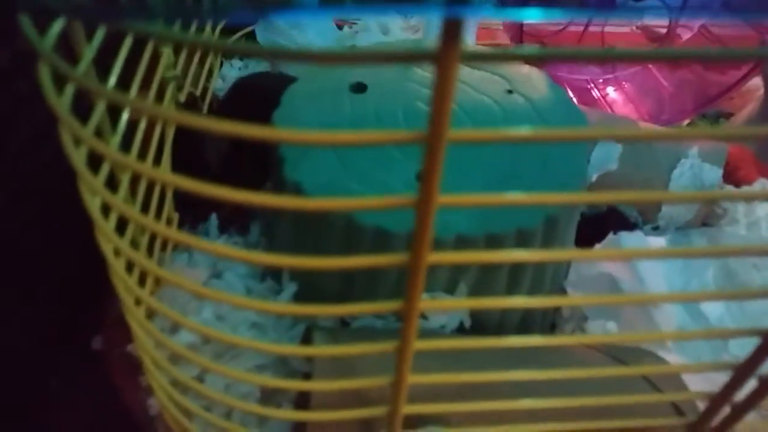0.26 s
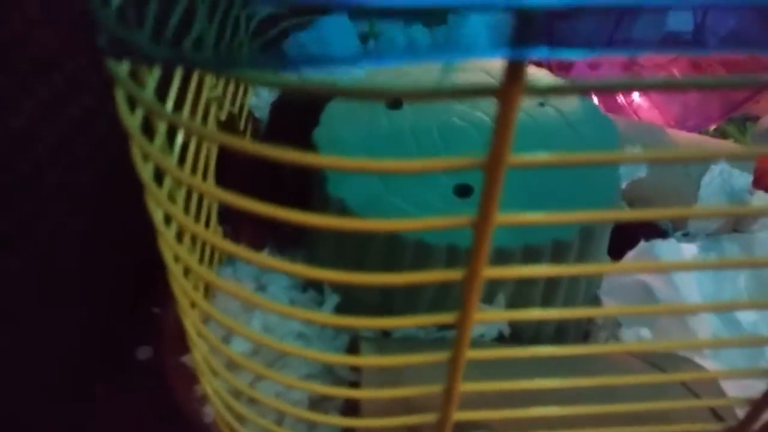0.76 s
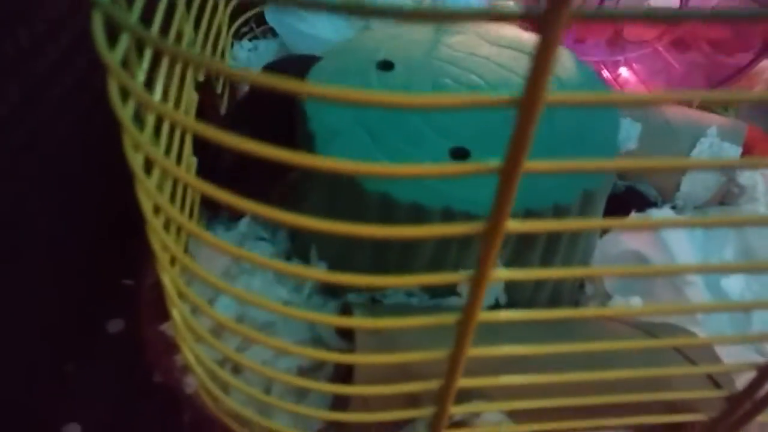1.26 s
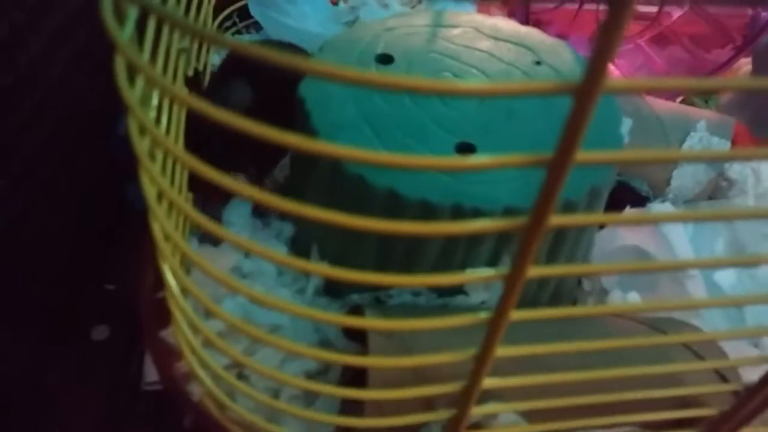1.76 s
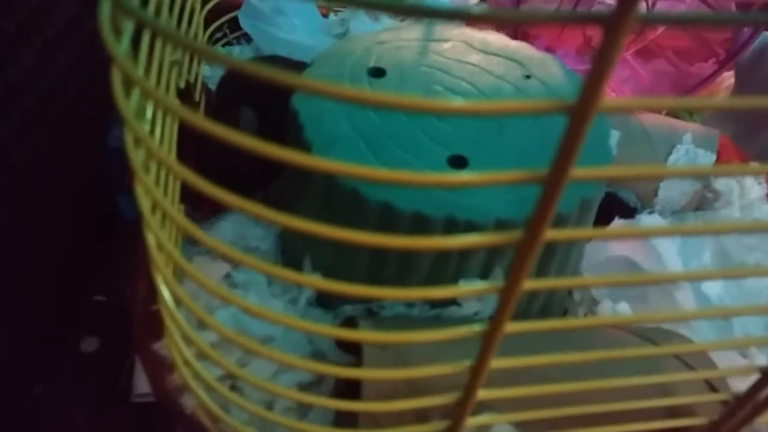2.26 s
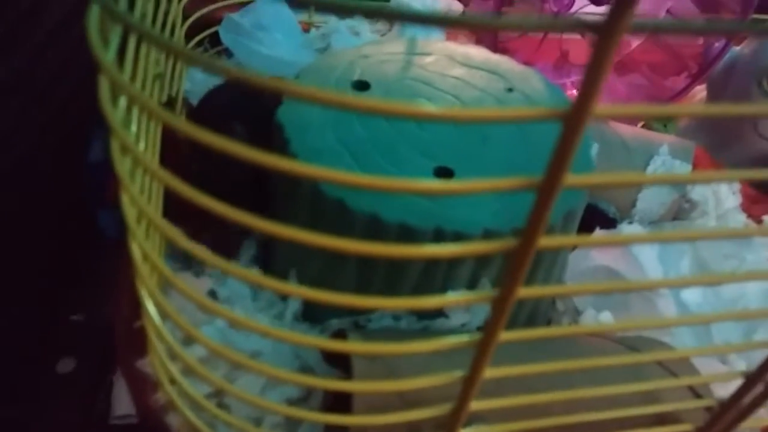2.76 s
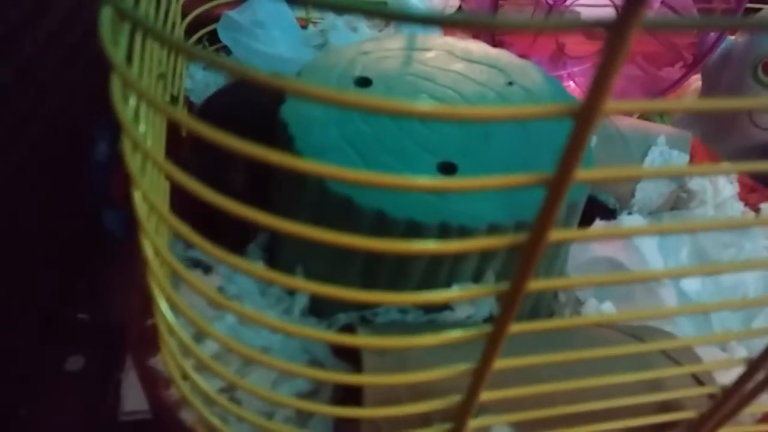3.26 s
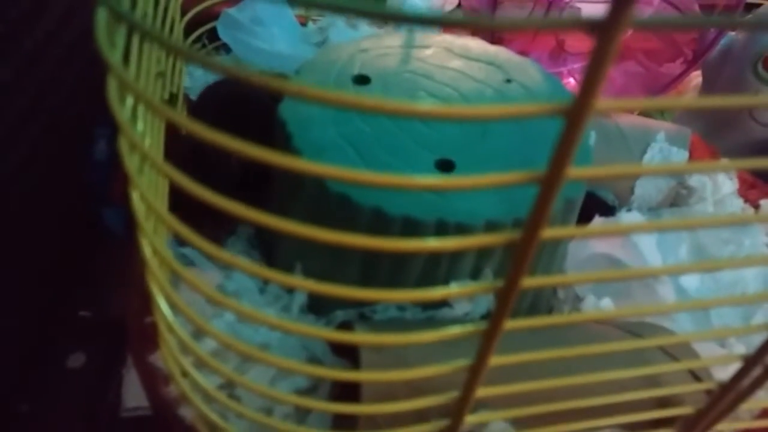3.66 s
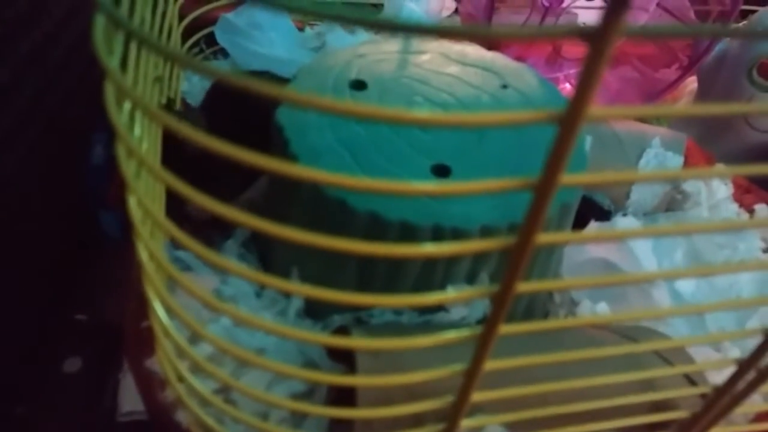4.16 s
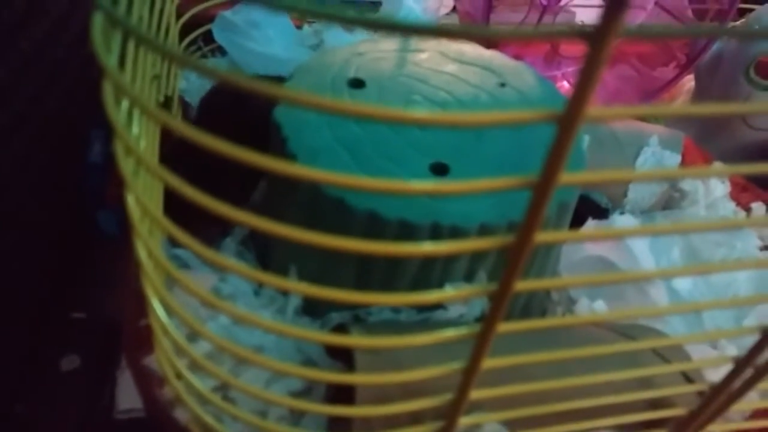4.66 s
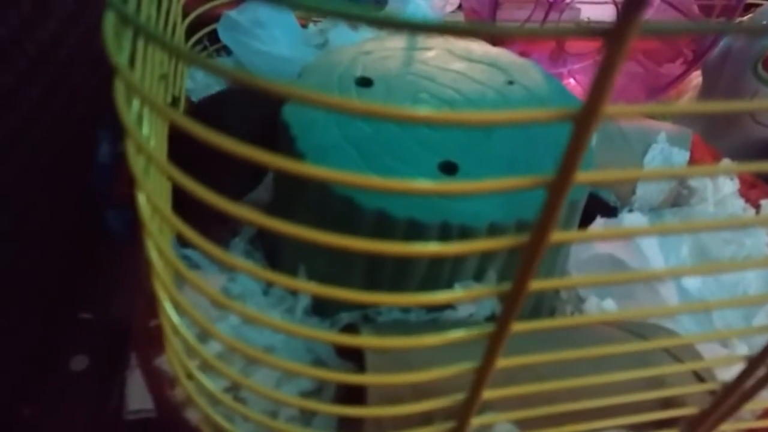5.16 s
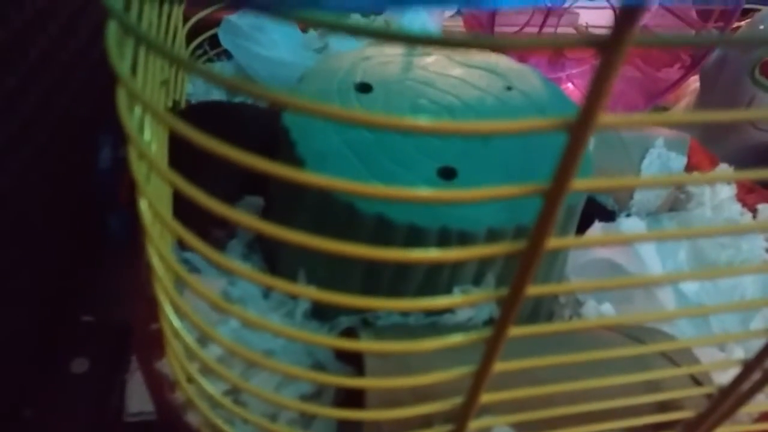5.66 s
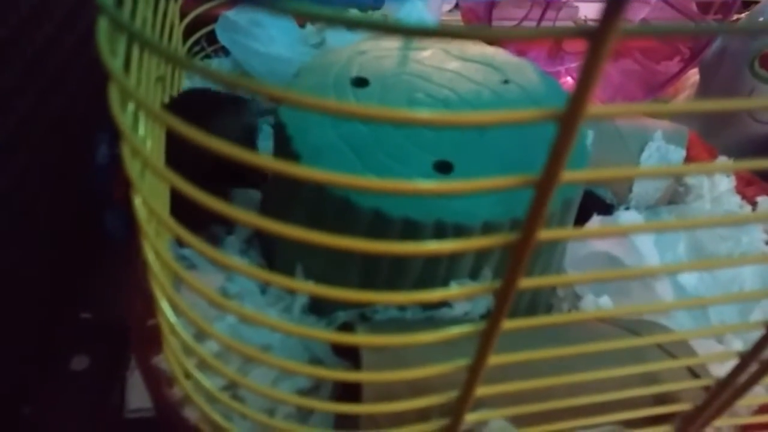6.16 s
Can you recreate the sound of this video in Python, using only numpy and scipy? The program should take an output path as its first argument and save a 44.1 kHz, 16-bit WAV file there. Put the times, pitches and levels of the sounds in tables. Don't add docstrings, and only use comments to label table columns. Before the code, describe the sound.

A small pet rodent digs in paper bedding in its cage, with dry snaps, soft knocks and a few sharp loud plastic pops.

```python
import sys
import numpy as np
from scipy import signal
from scipy.fft import rfft, irfft
from scipy.io import wavfile
from scipy.ndimage import uniform_filter1d

SR = 44100
rng = np.random.default_rng(int(sys.argv[2]) if len(sys.argv) > 2 else 0)


def volts_from_decibels(level):
    exponent = np.asarray(level, float) / 20
    return 10 ** exponent


def transcribe(signal):
    frames = np.atleast_2d(signal).T
    limited = np.clip(frames, -1, 1)
    pcm = np.round(limited * 32767).astype(np.int16)
    wavfile.write(sys.argv[1], SR, pcm)


N = 283104
TIME = np.arange(N) / SR

# start in seconds, peak in dB, crack pitch in Hz,
# sharp edge in dB relative to the peak.
STIFF_FOLDS = [(0.0294, -21.5, 2000, -25), (0.0702, -16.5, 2060, -29), (0.0716, -41, 1910, -14),
               (0.1448, -17.5, 2090, -21.5), (0.148, -30.5, 2190, -11), (0.1723, -19, 1800, -38),
               (0.228, -16.5, 1960, -33), (0.231, -33, 1700, -11), (0.3256, -18, 1970, -28.5),
               (0.3704, -23.5, 1830, -29), (0.602, -20, 1960, -21), (0.733, -27, 1540, -40),
               (1.0988, -23, 2350, -26), (1.1564, -17, 1940, -29), (1.2135, -17.5, 1830, -43),
               (1.5862, -16.5, 1980, -23), (1.589, -24, 1610, -18), (1.63, -16.5, 2100, -20),
               (1.648, -34, 2290, -16), (2.7149, -13, 1630, -30), (2.7161, -21, 2000, -17),
               (2.7174, -18, 1250, -19.5), (4.0582, -25, 1590, -27), (4.3329, -21, 1930, -20),
               (4.3361, -25, 2040, -36), (4.6196, -14.5, 1680, -22), (4.6209, -14.5, 1900, -25),
               (5.4714, -17, 1900, -15.5), (5.4736, -19.5, 1740, -19), (5.4763, -22.5, 1300, -30)]
# start in seconds, peak in dB, crack pitch in Hz.
SOFT_CREASES = [(0.1743, -37, 1680), (5.473, -19, 1800), (0.3276, -27.5, 1530), (0.3724, -30, 1560),
                (0.3753, -28, 1460), (0.826, -36, 1680), (0.969, -38, 1860), (1.0005, -36, 2330),
                (1.0163, -30, 2360), (1.1121, -26, 1850), (1.1874, -24, 1710), (1.3268, -43.5, 2220),
                (1.441, -41.5, 1680), (1.4552, -40, 1720), (1.5795, -29, 1520), (1.5955, -32, 1530),
                (1.6258, -25, 1500), (1.6451, -32, 1930), (1.7116, -29.5, 2380), (1.7262, -36.5, 2450),
                (1.74, -38, 2150), (2.1255, -35, 1980), (4.6217, -33, 2000), (2.7194, -20.5, 1010),
                (2.899, -37, 1520), (3.244, -42.5, 2200), (2.712, -30, 1700), (4.6161, -30, 1500),
                (4.7594, -37, 1640), (5.467, -32, 1410)]
CREASE_EDGE_DB = -40

# start in seconds, peak in dB, fade in ms,
# slowing from 0 to 1 (1 = steady pitch), sharp edge in dB relative to the peak.
WALL_POPS = [
    (1.1623, -13, 0.57, 0.6, -40),
    (2.7224, -9.5, 1.2, 0.59, -32),
    (4.3402, -2.5, 0.82, 0.45, -3.5),
    (4.6224, -1, 1.15, 0.67, -8.5),
    (5.4774, -5, 0.95, 0.5, -8),
]
FIRST_SWING_MS, FIRST_SWING_SHARE = 0.24, 0.27

# top of the swing in seconds, peak in dB, swing pitch in Hz.
KICKS = [(0.0322, -28.5, 343), (0.1004, -37, 432), (0.1761, -21.5, 230), (0.2307, -15.5, 244),
         (0.358, -33, 404), (0.377, -18.5, 230), (0.6024, -25.5, 298), (0.736, -25, 366),
         (0.7744, -31, 268), (0.7807, -27, 334), (0.8941, -31, 330), (1.0159, -22, 388), (1.188, -16, 370),
         (1.2148, -21, 363), (1.4444, -35, 348), (1.537, -36, 328), (1.6313, -7, 308), (1.6456, -14, 386),
         (1.7144, -27.5, 420), (1.7291, -30, 415), (1.743, -31.5, 440), (2.1283, -34, 298),
         (2.6629, -27.5, 383), (2.7155, -25, 478), (2.7628, -33, 320), (3.519, -35, 350),
         (4.4529, -30, 313), (5.3498, -34, 386), (5.3706, -34.5, 367), (5.472, -25, 420)]
# top of the swing in seconds, peak in dB, swing pitch in Hz.
PAW_STEPS = [(0.1458, -33.5, 540), (0.4473, -33, 207), (0.474, -28.5, 420), (0.7, -33, 400),
             (0.972, -28, 373), (1.0372, -28, 370), (1.1005, -26, 328), (1.1159, -17, 376),
             (1.3878, -35, 392), (1.4148, -38, 347), (1.5951, -25, 440), (1.917, -24.5, 482),
             (2.1904, -24, 486), (2.2714, -26, 480), (2.6569, -28.5, 420), (2.713, -28, 500),
             (2.8624, -23.5, 420), (2.916, -25, 487), (3.3388, -33.5, 420), (4.0581, -28, 362),
             (4.0967, -42, 322), (4.208, -44, 120), (4.3335, -25.5, 510), (4.4607, -33, 424),
             (4.4977, -36, 463), (4.7449, -30.5, 404), (4.96, -31, 420), (5.1175, -26.5, 436),
             (5.1392, -42, 353), (5.3868, -28, 500)]
# top of the swing in seconds, peak in dB, swing pitch in Hz.
NUDGES = [(0.0721, -32.5, 437), (0.3263, -25.5, 355), (0.3465, -35.5, 523), (0.6832, -29, 414),
          (0.7273, -31, 310), (0.832, -36.5, 290), (0.645, -38.5, 151), (0.536, -40, 190),
          (1.1756, -25.5, 376), (1.3219, -36, 408), (1.3287, -36, 460), (1.3493, -29.5, 185),
          (1.4771, -36.5, 420), (1.661, -40, 604), (2.5576, -32.5, 434), (2.619, -30, 493),
          (2.163, -43, 420), (2.8994, -29, 443), (3.5063, -39.5, 394), (4.227, -49, 155), (4.337, -26, 475),
          (4.41, -39.5, 473), (4.7755, -37.5, 486), (5.0685, -40, 386), (5.134, -52, 342),
          (5.032, -46.5, 330), (5.2333, -38.5, 420), (6.2406, -51, 260), (6.2525, -48, 217),
          (6.3722, -36, 183)]
# top of the swing in seconds, peak in dB, swing pitch in Hz.
LEANS = [(0.878, -28.5, 460), (1, -32, 420), (1.5879, -33.5, 380), (2.7983, -33.5, 530), (4.59, -32, 470),
         (1.87, -46, 410), (1.606, -40, 430)]
KICK_SWINGS, STEP_SWINGS, NUDGE_SWINGS, LEAN_SWINGS = 0.78, 1.09, 1.815, 3.36
TRAY_HUM_HZ, TRAY_HUM_WIDTH_HZ, TRAY_HUM_DB = 440, 59, -5
TRAY_TICK_HZ, TRAY_TICK_WIDTH_HZ, TRAY_TICK_DB = 1037, 330, -2.5

# start in seconds, hold in seconds, drag in dB,
# dry scratch in dB.
DIG_STROKES = [(0.34, .01, -53, -66), (0.466, 0.049, -53.5, -56.5), (0.599, 0.0046, -49.5, -74),
               (0.723, 0.0092, -35, -55), (0.737, 0.019, -49, -39), (0.798, 0.05, -51.5, -51),
               (0.87, 0.014, -49, -59), (0.985, 0.048, -38.5, -46.5), (1.119, .01, -39, -71),
               (1.171, 0.0055, -33.5, -42), (1.222, 0.038, -47, -41), (1.325, .03, -51, -56),
               (1.631, 0.0044, -35, -70), (1.749, .02, -52, -72), (1.885, 0.035, -54.5, -68),
               (2.214, 0.084, -52, -66), (2.6, 0.039, -49.5, -58), (2.533, 0.03, -48, -64),
               (2.722, 0.074, -39, -45), (2.865, 0.029, -41, -59), (3.027, .07, -57.5, -65),
               (3.511, 0.004, -57.5, -59), (4.226, .01, -53, -73), (4.328, .005, -51, -70),
               (4.436, 0.05, -41.5, -51.5), (4.55, 0.062, -43.5, -60), (4.752, 0.035, -46.5, -56.5),
               (5.341, 0.018, -56.5, -67), (5.463, .005, -56, -75), (6.243, .01, -58, -75)]
STROKE_RISE_DB_S, STROKE_FALL_DB_S = 483, 398
SCRATCH_RISE_DB_S, SCRATCH_FALL_DB_S = 700, 1100
# time in seconds, drag in dB.
FIDGETING = [(0, -63), (.05, -57.5), (.32, -64), (1.3, -57.5), (1.58, -60.5), (1.8, -61), (2.0, -68.5),
             (2.2, -56), (2.36, -73), (2.41, -52), (2.49, -64.5), (2.68, -64), (3.1, -60.5), (3.48, -68.5),
             (4.72, -68), (4.81, -64), (5.2, -68.5), (6.42, -69.5)]
FIDGET_SCRATCH_DB, FIDGET_SCRATCH_SHARE = -71, 0.46
BRIGHT_ABOVE_HZ, BRIGHT_AT_DB, BRIGHT_SHARE = 1400, -43.5, 0.27
# start in seconds, hold in seconds, rumble in dB,
# settling in dB per second.
WEIGHT_SHIFTS = [(0.113, 0.14, -53, 550), (0.336, .37, -53, 50), (0.731, .005, -42, 110),
                 (0.993, 0.21, -48.5, 130), (1.346, 0.0046, -40, 420), (1.398, 0.21, -53, 100),
                 (1.642, 0.026, -41, 108), (2.11, .005, -50, 95), (2.585, 0.11, -49, 100),
                 (2.745, .005, -41.5, 125), (3.01, 0.22, -54, 84), (3.52, .005, -57.5, 109),
                 (4.06, .005, -59.5, 122), (4.217, 0.0046, -54, 337), (4.335, .005, -46, 853),
                 (4.448, .005, -44, 420), (4.55, .07, -75.5, 194), (4.75, .005, -62, 78),
                 (4.978, 0.1, -62, 90), (5.43, 0.062, -55, 432), (6.221, .005, -51, 120)]
SHIFT_RISE_DB_S, STILL_DB = 450, -78
# pitch in Hz, width in Hz, level in dB.
TRAY_MODES = [(230, 150, -5.5), (420, 105, 0.5), (603, 288, -8)]
# pitch in Hz, width in Hz, level in dB.
PAPER_MODES = [(805, 146, 5), (1146, 154, 1.5), (1640, 116, -5), (2080, 255, -6), (2470, 310, -12.5),
               (3500, 640, -18.5), (7300, 2600, -29.5)]

# frequency in Hz, level in dB per Hz.
HISS_COLOUR = [(25, -18), (55, -7.5), (200, 0.5), (600, -17.5), (1500, -11), (5000, -17), (9200, -23.5),
               (15000, -17.5)]
HISS_TOP_HZ = 15750
# pitch in Hz, level in dB rms.
MAINS_HUM = [(60, -81), (120, -80), (240, -79), (360, -76), (480, -104.5), (634, -90)]
WHINE_HZ, WHINE_WIDTH_HZ, WHINE_DB = 8170, 73, -15.5
SWISH_S, SWISH_HOLD_S, SWISH_DB, SWISH_SLOPE_DB_S = 1.24, 0.013, -62.5, 254
GATE_SHUT_DB, GATE_OPEN_DB = -75, -68
GATE_FROM_DB, GATE_FULL_DB = -69.5, -60
GATE_HEARS_S, GATE_LAG_S = 0.01, 0.028
PORT_HZ, PORT_WIDTH_HZ = 13300, 4500
TOP_HZ = 16600


def curve(table):
    s, *columns = np.transpose(table)
    return [np.interp(TIME, s, c) for c in columns]


def unit(x):
    return x / np.sqrt(np.mean(x ** 2))


def ring(x, hz, width_hz):
    return signal.lfilter(*signal.iirpeak(hz, hz / width_hz, fs=SR), x)


def body(x, modes):
    total = 0
    for k, (hz, width, db) in enumerate(modes):
        once = ring(x, hz, 1.64 * width)
        total = total + (-1) ** k * volts_from_decibels(db) * ring(once, hz, 1.64 * width)
    return unit(total)


def grains(rate, spread_db, smooth):
    when, size = rng.random(N), rng.random(N)
    sign, rub = rng.standard_normal(N), rng.standard_normal(N)
    slips = (when < rate / SR) * volts_from_decibels(spread_db * size) * np.sign(sign)
    return unit(slips) + smooth * rub


def walk(rate):
    k = int(SR / rate)
    steps = np.repeat(rng.standard_normal(N // k + 1), k)
    return unit(uniform_filter1d(steps, k)[:N])


def add(out, s, sound):
    i = int(round(s * SR))
    out[i:i + len(sound)] += sound[:N - i]


def gesture(s, hold_s, db, rise_db_s, fall_db_s):
    rise = rise_db_s * np.maximum(s - TIME, 0)
    fall = fall_db_s * np.maximum(TIME - s - hold_s, 0)
    return volts_from_decibels(db - rise - fall)


def snaps():
    out, edge = np.zeros(N), np.zeros(N)
    folds = STIFF_FOLDS + [(*row, CREASE_EDGE_DB) for row in SOFT_CREASES]
    lead = 28
    t = (np.arange(400) - lead) / SR
    dull = signal.butter(3, [600, 2600], "band", fs=SR, output="sos")
    crackle = signal.sosfilt(dull, rng.standard_normal((len(folds), len(t))))
    for (s, db, hz, edge_db), noise in zip(folds, crackle):
        cycles = hz * t
        spike = np.exp(-(cycles / 0.38) ** 2) * np.cos(2 * np.pi * 0.53 * cycles)
        late = np.maximum(cycles, 0)
        rebound = 0.82 * late * np.exp(-late / 0.59) * np.sin(2 * np.pi * 0.52 * late ** 0.3)
        tail = volts_from_decibels(1.5) * np.tanh(late) * np.exp(-t / 0.0012) * noise
        add(out, s - lead / SR, volts_from_decibels(db + 4.0) * (tail + rebound - spike))
        add(edge, s, -volts_from_decibels(db + edge_db + 8.0) * np.ones(1))
    return out + ring(edge, PORT_HZ, PORT_WIDTH_HZ) + volts_from_decibels(13.5) * ring(edge, 4500, 2200)


def pops():
    out, edge = np.zeros(N), np.zeros(N)
    lead = 8
    ms = (np.arange(800) - lead) / SR * 1000
    late = np.maximum(ms, 0)
    for s, db, fade_ms, slowing, edge_db in WALL_POPS:
        first_ms = min(FIRST_SWING_MS, FIRST_SWING_SHARE * fade_ms)
        turns = (late / first_ms) ** slowing / 4
        shape = np.where(ms < 0, np.exp(-(ms / 0.083) ** 2), np.exp(-(late / fade_ms) ** 0.82))
        add(out, s - lead / SR, -volts_from_decibels(db) * shape * np.cos(2 * np.pi * turns))
        add(edge, s, -volts_from_decibels(db + edge_db) * np.ones(1))
    return out + ring(edge, PORT_HZ, PORT_WIDTH_HZ) + volts_from_decibels(-5.5) * ring(edge, 5000, 6200)


def knocks():
    out = np.zeros(N)
    t = np.arange(2000) / SR
    kinds = [(KICKS, KICK_SWINGS), (PAW_STEPS, STEP_SWINGS), (NUDGES, NUDGE_SWINGS), (LEANS, LEAN_SWINGS)]
    for rows, swings in kinds:
        for s, db, hz in rows:
            rise = swings / hz / 2.526
            u = t / rise
            turns = 1.248 * hz * rise * u ** 0.8
            push = u * np.exp(1 - u)
            add(out, s - rise, -volts_from_decibels(db) * push * np.cos(2 * np.pi * turns))
    tick = ring(out, TRAY_TICK_HZ, TRAY_TICK_WIDTH_HZ)
    tick = ring(tick, TRAY_TICK_HZ, 2 * TRAY_TICK_WIDTH_HZ)
    hum = ring(out, TRAY_HUM_HZ, TRAY_HUM_WIDTH_HZ)
    return out + volts_from_decibels(TRAY_HUM_DB) * hum + volts_from_decibels(TRAY_TICK_DB) * tick


def drag():
    fidget_db, = curve(FIDGETING)
    pulls = [gesture(s, hold, db, STROKE_RISE_DB_S, STROKE_FALL_DB_S) for s, hold, db, _ in DIG_STROKES]
    pull = np.maximum(volts_from_decibels(fidget_db), np.max(pulls, axis=0))
    idle = volts_from_decibels(FIDGET_SCRATCH_DB + FIDGET_SCRATCH_SHARE * (fidget_db - np.mean(fidget_db)))
    scratches = [gesture(s, hold, db, SCRATCH_RISE_DB_S, SCRATCH_FALL_DB_S) for s, hold, _, db in DIG_STROKES]
    scratch = np.maximum(idle, np.max(scratches, axis=0))
    loads = [gesture(s, hold, db, SHIFT_RISE_DB_S, fall) for s, hold, db, fall in WEIGHT_SHIFTS]
    load = np.maximum(volts_from_decibels(STILL_DB), np.max(loads, axis=0))

    fits = walk(60)
    tray = body(grains(450, 15.8, 0.41), TRAY_MODES) * pull * volts_from_decibels(1.5 * fits + 0.2)
    paper = body(grains(4000, 9, 0.6), PAPER_MODES) * scratch * volts_from_decibels(fits - 0.65)
    high_pass = signal.butter(3, BRIGHT_ABOVE_HZ, "high", fs=SR, output="sos")
    treble = signal.sosfiltfilt(high_pass, paper)
    paper = paper + treble * ((scratch / volts_from_decibels(BRIGHT_AT_DB)) ** BRIGHT_SHARE - 1)
    rumble = body(grains(140, 15.3, 0.52), [(68.3, 83, 1.5), (137.4, 83, 9.0)])
    weight = rumble * load * volts_from_decibels(2 * walk(14) - 3.0)
    return tray + paper + weight


def gate(sound):
    power = np.abs(uniform_filter1d(sound ** 2, int(GATE_HEARS_S * SR)))
    heard_db = 10 * np.log10(power + 1e-12)
    opening = np.clip((heard_db - GATE_FROM_DB) / (GATE_FULL_DB - GATE_FROM_DB), 0, 1)
    keep = np.exp(-1 / (GATE_LAG_S * SR))
    opening = 1 - signal.lfilter([1 - keep], [1, -keep], 1 - opening)
    return GATE_SHUT_DB + (GATE_OPEN_DB - GATE_SHUT_DB) * opening


def background(mouse):
    gate_db = gate(mouse)
    swish = gesture(SWISH_S, SWISH_HOLD_S, SWISH_DB, SWISH_SLOPE_DB_S, SWISH_SLOPE_DB_S)
    hz, db = np.transpose(HISS_COLOUR)
    f = np.fft.rfftfreq(N, 1 / SR) + 1
    colour = volts_from_decibels(np.interp(np.log(f), np.log(hz), db)) * (f < HISS_TOP_HZ)
    hiss = unit(irfft(rfft(rng.standard_normal(N)) * colour, N))
    whine_hz = WHINE_HZ + WHINE_WIDTH_HZ * walk(260)
    whine = volts_from_decibels(WHINE_DB) * np.sin(2 * np.pi * np.cumsum(whine_hz) / SR)
    hum = sum(volts_from_decibels(db + 3.5) * np.sin(2 * np.pi * (hz * TIME + rng.random())) for hz, db in MAINS_HUM)
    noise = (hiss + whine) * np.hypot(volts_from_decibels(gate_db), swish) * volts_from_decibels(8.0 + 0.6 * walk(25))
    return noise + hum * volts_from_decibels(0.9 * (gate_db + 75.5))


def scene():
    high_pass = signal.butter(2, 95, "high", fs=SR, output="sos")
    blows = signal.sosfilt(high_pass, snaps() + pops() + knocks())
    mouse = blows + drag()
    return (mouse + background(mouse))[None]


def band_limit(x):
    return signal.sosfilt(signal.butter(12, 16970, fs=SR, output="sos"), x)


def record(dry):
    x = signal.sosfilt(signal.butter(4, 52, "high", fs=SR, output="sos"), dry)
    x = signal.sosfilt(signal.ellip(8, 0.2, 60, TOP_HZ, fs=SR, output="sos"), x)
    return band_limit(x)


dry = scene()
out = record(dry)
transcribe(out)
```